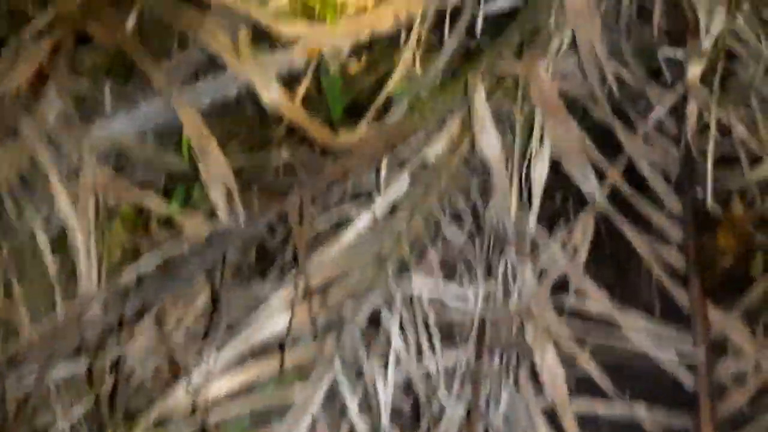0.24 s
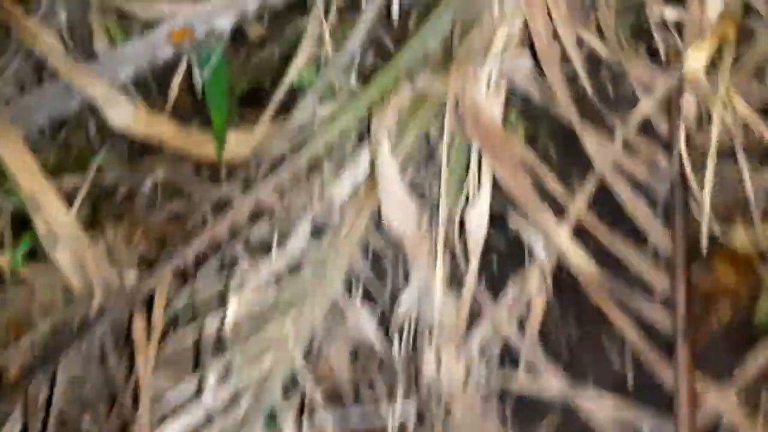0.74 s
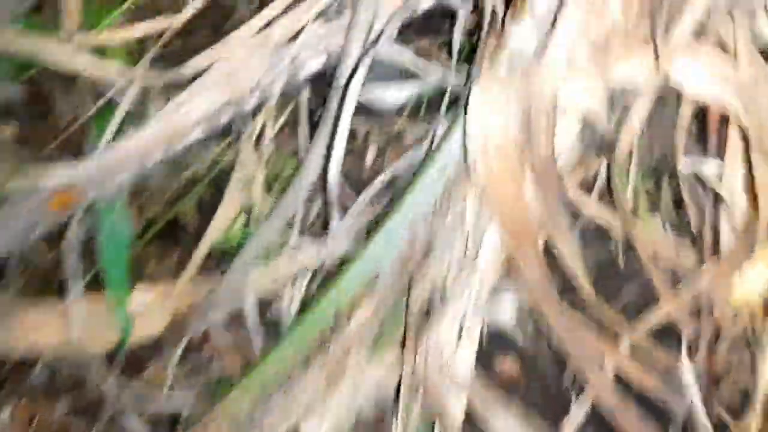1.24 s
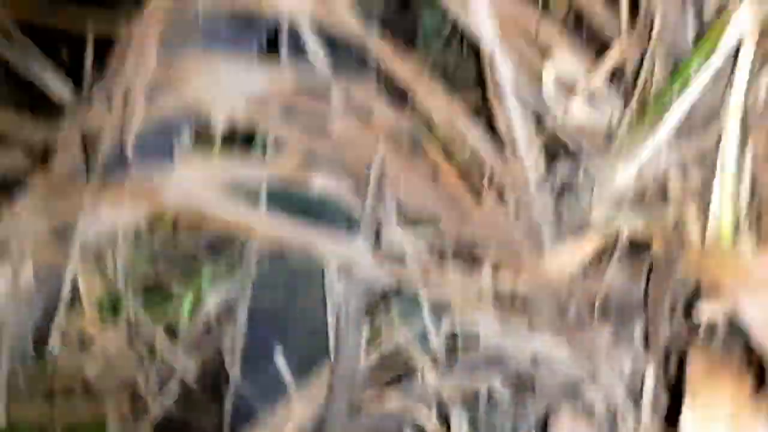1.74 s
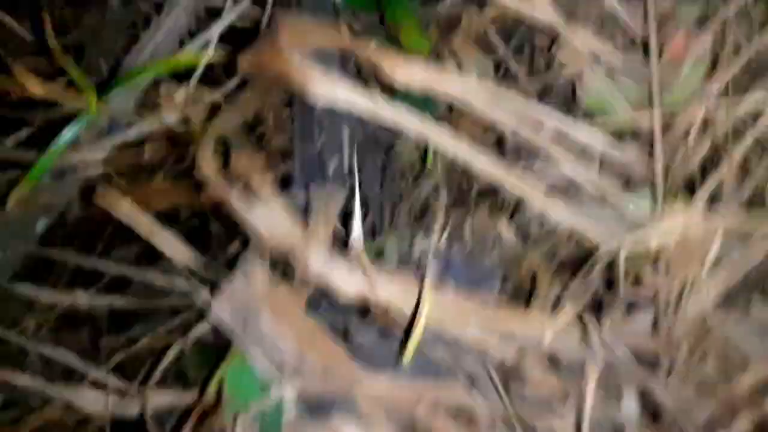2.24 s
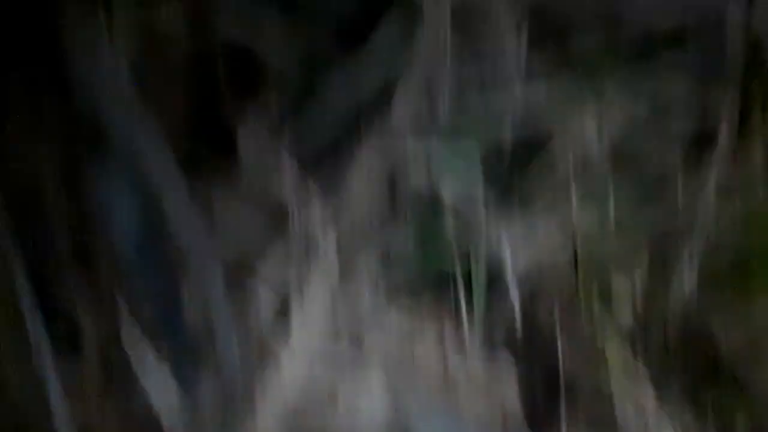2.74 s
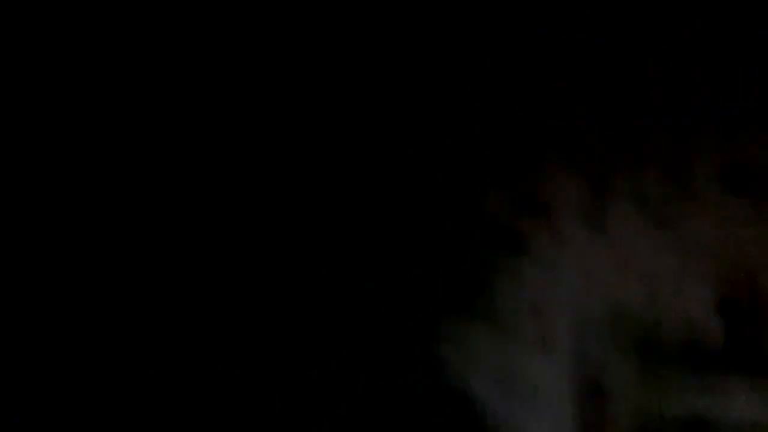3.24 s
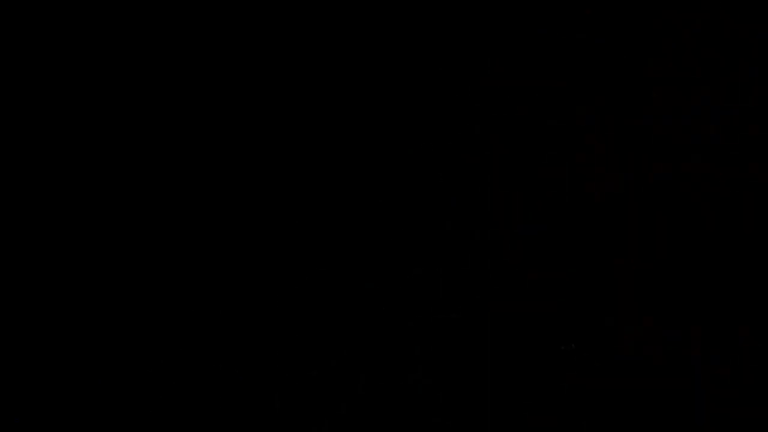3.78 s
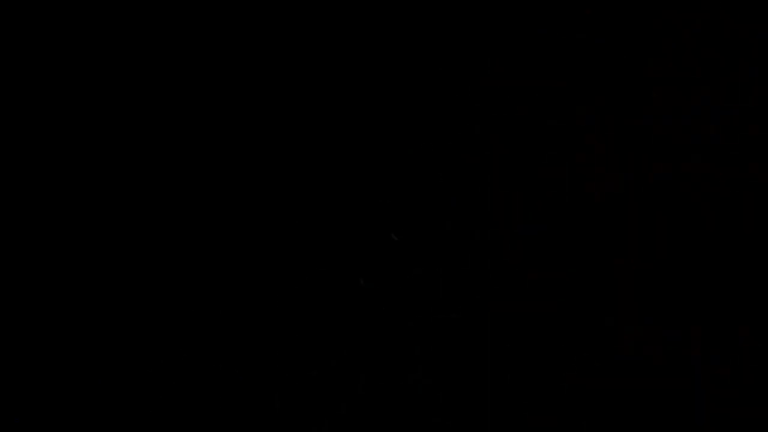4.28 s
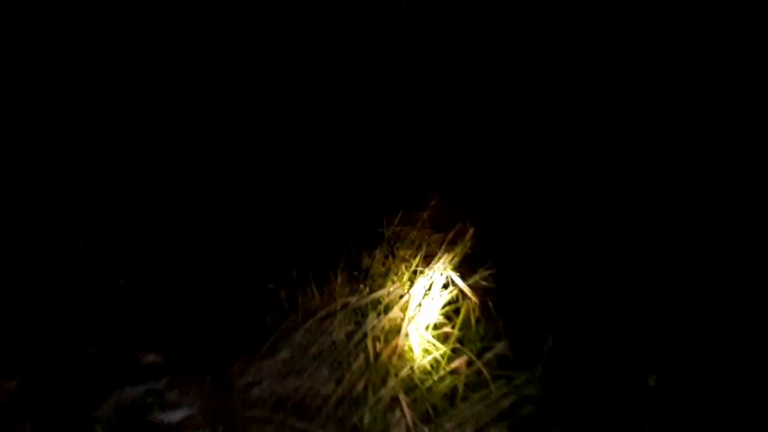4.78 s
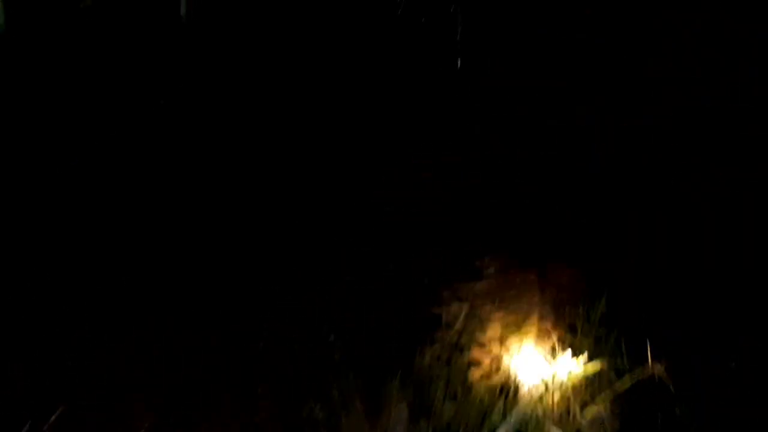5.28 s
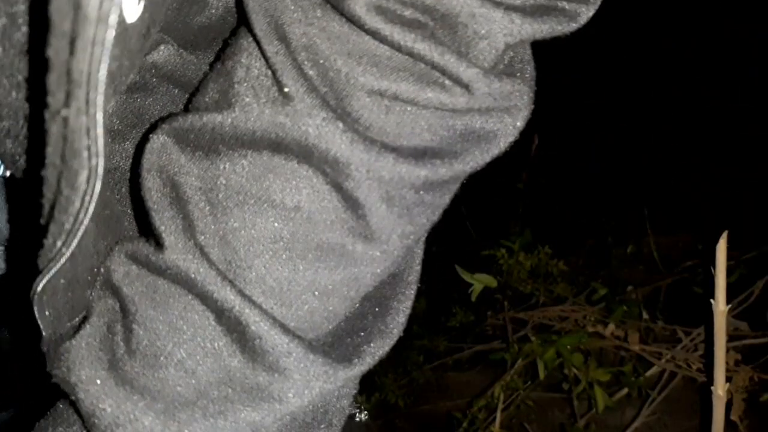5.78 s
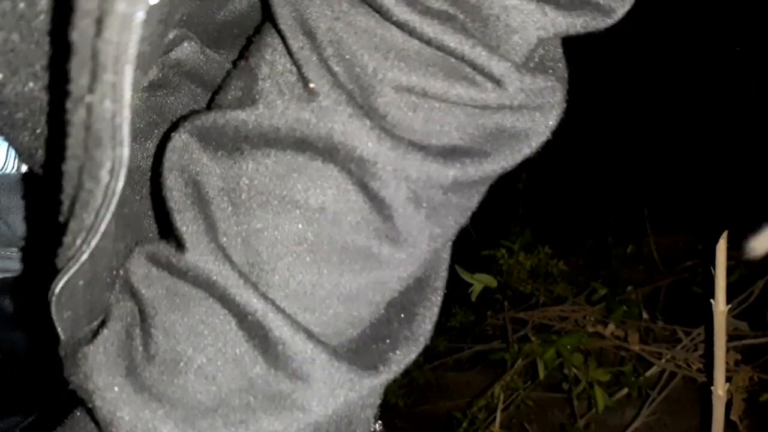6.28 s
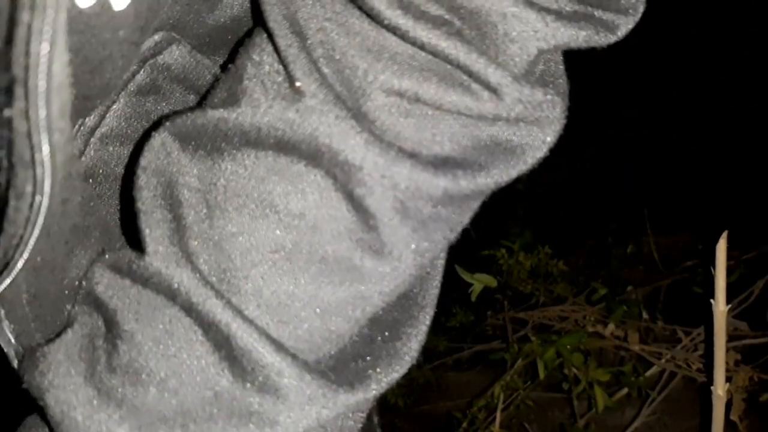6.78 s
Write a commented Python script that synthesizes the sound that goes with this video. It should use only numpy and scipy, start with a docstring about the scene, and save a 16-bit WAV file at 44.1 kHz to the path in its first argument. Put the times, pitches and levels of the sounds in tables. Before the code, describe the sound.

Close, bright crackling of dry fronds and grass swells with each push of a walker's legs, full of sharp little breaks. Dull scrapes and low bumps come from the handheld stereo microphone, loudest along with the biggest snaps. After a few lighter steps the movement ends and the night background comes forward: a thin insect hiss, a steady high trill, quiet chirps and a brief squeak in the right ear.

```python
"""Night walk through dry brush

A walker pushes through dry fronds, a small stereo recorder in hand. Stalks rustle and snap.
Stems and fingers scuff the casing and knock the right microphone port (its opening).
After about 5.5 s the rustle ends and the background steps up;
chirping insects and one short squeak are heard."""
import sys
import numpy as np
from scipy import signal
from scipy.fft import rfft, irfft, next_fast_len
from scipy.io import wavfile

SR = 44100
rng = np.random.default_rng(int(sys.argv[2]) if len(sys.argv) > 2 else 0)


def digitize_waveform(pressure):
    """Quantize a signal to 16-bit integers and store it at the path in sys.argv[1].

    Rows of a 2-D input are taken as channels; values are limited to [-1, 1].
    """
    field = np.atleast_2d(pressure).T
    bounded = np.clip(field, -1, 1)
    quanta = np.round(bounded * 32767).astype(np.int16)
    wavfile.write(sys.argv[1], SR, quanta)


N = 309793

# Tone colour of the rustle: f/Hz, relative level/dB
RUSTLE_SPECTRUM = [(180, -46.5), (300, -14), (1020, -11), (1970, -4.5), (2250, -3), (3510, -1.5),
                   (3870, .5), (5660, -2), (6360, 1), (10300, .5), (15500, 3)]
# Each push of a foot or leg through the stalks:
# t/s at full level, hold/s, rise/s per 20 dB, fall/s per 20 dB, level/dB, brightness/dB per octave
PUSHES = [(0.0, 0.078, 0.11, 0.2, -57.5, 0.5), (0.332, 0.139, 0.057, 0.4, -54.5, -3),
          (0.641, 0.026, 0.27, 0.112, -44.0, -0.5), (0.809, 0.138, 0.172, 0.342, -51, -2.5),
          (1.288, 0.162, 0.081, 0.105, -42.0, -0.5), (1.531, 0.025, 0.061, 0.179, -38, -1.5),
          (1.745, 0.182, 0.347, 0.143, -60.0, 2.0), (2.002, 0.046, 0.048, 0.146, -50.0, -1.0),
          (2.221, 0.201, 0.222, 0.044, -37.5, 0.5), (2.457, 0.077, 0.065, 0.078, -40.5, -0.5),
          (2.575, 0.027, 0.079, 0.031, -42.0, -4.0), (2.651, 0.277, 0.147, 0.385, -59.5, 1.0),
          (3.171, 0.061, 0.223, 0.313, -55.5, 0.5), (3.757, 0.128, 0.096, 0.035, -49.0, -1),
          (3.914, 0.04, 0.01, 0.014, -46.0, 2.5), (3.979, 0.024, 0.003, 0.061, -32, 0.5),
          (4.066, 0.032, 0.024, 0.048, -50.0, 3.5), (4.145, 0.014, 0.015, 0.069, -64.0, 6.0),
          (4.268, 0.022, 0.005, 0.065, -55.5, 2.0), (4.36, 0.17, 0.05, 0.1, -75, 4),
          (4.629, 0.199, 0.126, 0.123, -56.0, 1.0), (4.872, 0.043, 0.045, 0.128, -49.0, 0.5),
          (5.12, 0.17, 0.05, 0.1, -76, 1.5), (5.383, 0.031, 0.052, 0.112, -57, 1.5),
          (5.521, 0.021, 0.015, 0.09, -53.5, 2.5)]


def rustle():
    """Sliding, folding stalks make thousands of tiny cracks a second, each spanning low to high."""
    level_db, tilt_db = push_curves()
    cracks = grains(per_s=2000, spread_db=3.5, clump_db=3, hiss=.7)
    crackle = rms_one(with_notes(cracks))
    stalks = coloured([crackle, -crackle], RUSTLE_SPECTRUM, tilt_db, flicker_db=2.04, pivot_hz=2900)
    return stalks * from_db(level_db) * sides(-3.2)


def push_curves():
    """The rustle's level and brightness follow the pushes of the legs."""
    *shape, brightness = np.transpose(PUSHES)
    return level_and_tilt(swells(*shape), brightness)


# Faint narrow notes within the crackle, which also colour the snaps: f/Hz, width/Hz, level/dB
RUSTLE_NOTES = [(1500, 110, -24), (2080, 60, -28), (2310, 110, -21), (2750, 100, -27), (3700, 130, -25),
                (4200, 200, -22), (4620, 120, -26), (5300, 110, -25), (6500, 150, -24), (7500, 130, -24),
                (9200, 150, -25), (10100, 150, -24)]


def with_notes(cracks):
    """Adds faint narrow notes that swell and fade at random within the crackle."""
    return cracks + sum(from_db(db + 5.5 * drift(9)) * rms_one(resonance(cracks, hz, width_hz))
                        for hz, width_hz, db in RUSTLE_NOTES)


# The loudest stalks breaking: t/s, peak level/dB, f/Hz
BIG_SNAPS = [(1.4032, -27, 11200), (1.4212, -28, 8000), (1.5075, -29, 5430), (1.515, -22, 1700),
             (1.5285, -24, 1500), (1.5329, -22.0, 4190), (1.5604, -25.0, 11000), (1.595, -30, 1100),
             (1.6195, -27, 1200), (2.079, -31, 9000), (2.096, -33, 7000), (2.1186, -23, 4500),
             (2.2697, -19, 8900), (2.3431, -15.0, 9000), (2.4194, -22.0, 7460), (2.4568, -15, 4200),
             (2.5067, -15, 6000), (2.5204, -24.0, 10600), (2.5706, -20, 2200), (2.6504, -33.0, 6000),
             (2.7177, -28.0, 9000), (2.7861, -36, 3000), (3.8202, -35.0, 3490), (3.8344, -38.0, 7000),
             (3.8918, -23, 4500), (3.9085, -37, 8000), (3.9135, -18, 4500), (3.9305, -31, 5000),
             (3.9715, -33, 8000), (3.9759, -12, 3500), (3.9772, -14, 7000), (4.0682, -25.0, 5000),
             (4.135, -45, 6000), (4.152, -43.0, 6800), (4.357, -52, 8500), (4.376, -51, 8500),
             (4.2647, -25, 6000), (4.7177, -31.0, 8000), (4.7234, -31.0, 8500), (4.8648, -25.0, 4800),
             (4.8883, -25.0, 4650), (5.3926, -30, 9000), (5.5164, -27, 3990), (5.5338, -37.0, 6000)]
# A bent stalk slipping in a quick run: t/s, number of slips, gap/s, peak level/dB, f/Hz, pan/dB
CREAKS = [(2.472, 5, .006, -37, 6500, -10), (2.7244, 2, 0.0038, -38, 9000, -7),
          (4.086, 6, 0.0048, -36.5, 7000, 2), (4.274, 4, 0.0097, -36.5, 9000, 3)]
SNAP_PAN_DB = -6   # pan is always left minus right, so below zero is to the right


def snaps():
    """Each break or slip is a sharp crack with its own colour and a short splintering tail."""
    slips = [(s + k * gap, *rest) for s, count, gap, *rest in CREAKS for k in range(round(count))]
    breaks = [(*row, SNAP_PAN_DB) for row in list(BIG_SNAPS) + small_snaps(count=140)] + slips
    out, t = np.zeros((2, N)), np.arange(1300) / SR
    age = np.maximum(t - .0008, 0)
    fade = (age > 0) * (np.exp(-age / .0004) + .12 * np.exp(-age / .004))   # crack + tail
    bursts = rng.standard_normal((len(breaks), 2, len(t))) * fade
    note_hz, note_width, _ = np.transpose(RUSTLE_NOTES)
    note_gains = from_db(rng.normal(-13, 6, (len(breaks), len(note_hz))))
    for (s, peak_db, hz, pan_db), burst, gains in zip(breaks, bursts, note_gains):
        crack = rms_one(resonance(burst, hz, .6 * hz))
        crack += .9 * rms_one(filtered(burst, 2, .3 * hz, "high"))
        for k in np.argsort(np.abs(np.log(note_hz / hz)))[:4]:   # the four nearest notes colour it
            crack += gains[k] * rms_one(resonance(burst, note_hz[k], 2 * note_width[k]))
        crack *= sides(pan_db)
        i = round(s * SR)
        out[:, i:i + len(t)] += from_db(peak_db) * crack / np.abs(crack.mean(axis=0)).max()
    return out


def small_snaps(count):
    """Thin stalks break at random moments, peaking 7 to 13 dB above the rustle around them."""
    when, weakness, colour = rng.random((count, 3)).T
    s = when * (N / SR - .1)
    rustle_db, _ = push_curves()
    peak_db = rustle_db[(s * SR).astype(int)] + 13 - 6 * weakness
    return list(zip(s, peak_db, 1500 * 8 ** colour))


def hand_shade(stalks):
    """The hand shields the right port from part of the stalks' highest treble."""
    left, right = stalks
    return np.array([left, right - .45 * filtered(right, 2, 9000, "high")])


# Knocks on the right port: t/s, level/dB, swing f/Hz
KNOCKS = [(2.3886, -7.5, 88), (2.4035, -18, 400), (2.405, -15, 400), (2.4066, -20, 400), (2.4098, -15, 110),
          (2.4146, -13, 300), (2.4193, -21, 300), (2.4246, -17, 300), (2.4261, -18, 200), (3.9765, -23, 90)]


def knocks():
    """A knock is a spike, then a step in pressure that swings out through the port's bass cut."""
    jolt = -np.ones(3000)
    jolt[:9] = 1.3 * np.sin(np.linspace(0, np.pi, 9))
    jolt = filtered(jolt, 2, 7000, "low")
    out = np.zeros(N)
    for s, level_db, swing_hz in KNOCKS:
        i = round(s * SR)
        out[i:i + len(jolt)] += from_db(level_db) * filtered(jolt, 4, swing_hz, "high")
    return out * from_db([[-40], [0]])


# Tone colour of a scuff: f/Hz, relative level/dB
SCUFF_SPECTRUM = [(71, -38.5), (120, -2.5), (304, -3.5), (567, -4), (1330, -9.5), (1570, -4.5),
                  (1800, -15.5)]
# Hand and stems scuffing the casing:
# t/s, hold/s, fall/s per 20 dB, scuff level/dB, brightness/dB per octave, rumble level/dB
SCUFFS = [(0.046, 0.038, 0.17, -68, -4, -82), (0.645, 0.021, 0.075, -44.5, 1.0, -51),
          (0.827, 0.17, 0.14, -69.5, -3.0, -73.5), (1.366, 0.014, 0.106, -56, 0.0, -63.5),
          (1.511, 0.101, 0.196, -56.0, 3.0, -81.5), (1.931, 0.037, 0.144, -77.5, -2.5, -67.0),
          (2.119, 0.023, 0.113, -54.5, -1.0, -65.5), (2.224, 0.081, 0.055, -51.0, 0.0, -58.5),
          (2.39, 0.027, 0.034, -43, -2.0, -39), (2.472, 0.099, 0.133, -61.0, -3.5, -62.0),
          (2.577, 0.018, 0.041, -45, 3, -61.0), (2.926, 0.055, 0.074, -68, -3, -74.5),
          (3.065, 0.11, 0.195, -65.5, 1.0, -75.5), (3.278, 0.04, 0.088, -84.5, 4.0, -70.5),
          (3.721, 0.119, 0.13, -67.0, -1.5, -82.0), (3.982, 0.008, 0.045, -52.0, -4.5, -41),
          (4.288, 0.027, 0.053, -72.0, 4.0, -90.0), (4.569, 0.071, 0.213, -78.5, 8.0, -105.0),
          (4.817, 0.092, 0.036, -61, 1, -72), (4.959, 0.021, 0.084, -64, 1.5, -78),
          (5.154, 0.054, 0.066, -77.0, 0.5, -87.0), (5.453, 0.026, 0.164, -70, 0.5, -82.0)]
SCUFF_RISE_S = .025   # per 20 dB


def scuffs():
    """Hand and stems slip on the casing: dull scrapes and low lumps of air, different in each port."""
    s, hold, fall, scuff_db, brightness, rumble_db = np.transpose(SCUFFS)
    # Every push also brushes stems over the casing, more quietly than it rustles.
    stems = swells(*np.transpose(PUSHES)[:-1]).sum(axis=1, keepdims=True)
    scuff_power = np.hstack([swells(s, hold, SCUFF_RISE_S, fall, scuff_db), stems * from_db(-21) ** 2])
    low_power = np.hstack([swells(s, hold, SCUFF_RISE_S, fall, rumble_db), stems * from_db(-36.5) ** 2])
    brightness = np.append(brightness, 3.5)   # the stems' own brightness
    scrape_db, tilt_db = level_and_tilt(scuff_power, brightness)
    lumps_db, _ = level_and_tilt(low_power, brightness)
    slips = [grains(per_s=300, spread_db=3, clump_db=2.5, hiss=.47) for _ in range(2)]
    scrape = coloured(slips, SCUFF_SPECTRUM, tilt_db, flicker_db=2.5, pivot_hz=450)
    scrape = filtered(scrape, 4, 1300, "low")
    lumps = rms_one(filtered(rng.standard_normal((2, N)), 2, [60, 140], "band"))
    return (from_db(scrape_db) * scrape + from_db(lumps_db) * lumps) * sides(-2.5)


# Fingers rubbing and thudding on the casing: t/s, length/s, f/Hz, width/Hz, level/dB
FINGER_RUBS = [(.045, .015, 1400, 900, -63), (.08, .07, 161, 28, -63), (.645, .05, 300, 120, -50),
               (.65, .04, 1530, 250, -54), (1.361, .012, 360, 130, -44), (1.375, .014, 360, 130, -45),
               (1.925, .07, 830, 50, -72), (2.925, .06, 165, 40, -61), (2.93, .05, 400, 80, -68),
               (4.266, .04, 716, 300, -67), (4.938, .015, 620, 150, -57), (4.955, .045, 450, 130, -57),
               (4.96, .04, 700, 200, -61), (5.145, .02, 600, 180, -68), (5.17, .05, 560, 250, -71),
               (5.18, .07, 810, 50, -73), (5.39, .045, 750, 300, -66), (5.445, .06, 740, 250, -64),
               (5.447, .03, 280, 120, -66), (5.49, .015, 270, 120, -65)]


def finger_rubs():
    """Rough noise rings in a hollow between hand and casing, quick to start and slower to end."""
    out, t = np.zeros((2, N)), np.arange(8000) / SR
    for s, length, hz, width_hz, level_db in FINGER_RUBS:
        fade = np.clip(t / .004, 0, 1) * np.exp(-(t / length) ** 4)
        rub = rng.standard_normal((2, len(t))) * fade
        hollow = resonance(resonance(rub, hz, width_hz), hz, 2 * width_hz)
        i = round(s * SR)
        out[:, i:i + len(t)] += from_db(level_db) * rms_one(hollow) * np.sqrt(length * SR / len(t))
    return out * sides(-2.5)


# Dull taps on the casing: t/s, strength/dB
TAPS = [(0.655, -35), (0.676, -38), (2.115, -55), (2.567, -39), (2.588, -34.5), (4.812, -49), (4.836, -48),
        (4.862, -41), (4.886, -42)]
# Notes that the casing rings at: f/Hz, width/Hz, gain/dB
CASING_RINGS = [(210, 170, 4), (354, 93, -15), (600, 200, -16), (900, 180, -7)]


def taps():
    """Soft touches set the casing ringing, with new strengths each time and in each port."""
    s, strength_db = np.transpose(TAPS)
    chance_db = rng.normal(0, 2.5, (len(s), len(CASING_RINGS), 2))
    out = 0
    for k, (hz, width_hz, db) in enumerate(CASING_RINGS):
        hits = from_db(strength_db[:, None] + db + chance_db[:, k])
        hits[:, 0] *= (-1) ** k   # every other note is upside down on the left
        clicks = np.zeros((2, N))
        clicks[:, np.round(s * SR).astype(int)] = hits.T
        out += resonance(clicks, hz, width_hz)
    return filtered(out, 3, [120, 1250], "band") * from_db([[-9], [0]])


# Path of the squeak at the right port: t/s, f/Hz, level/dB
SQUEAK_PATH = [(6.42, 1144, -84), (6.45, 1150, -75), (6.53, 1233, -71), (6.585, 1215, -67),
               (6.6, 1195, -48), (6.615, 1195, -43.5), (6.635, 1212, -39.5), (6.655, 1210, -44),
               (6.678, 1190, -48), (6.695, 1190, -80.5)]
# Its overtones: multiple of the pitch, relative level/dB
SQUEAK_OVERTONES = [(2, -15), (3, -22), (4, -23), (5, -34.5)]


def squeak():
    """Quick sticking and slipping makes a tone with an uneven pitch and fluttering overtones."""
    hz, _ = in_time(SQUEAK_PATH)
    _, level_db = in_time(SQUEAK_PATH, outside=-120)
    weak = np.clip((-55.5 - level_db) / 10, 0, 1)   # faint rubbing slips less steadily
    wobble = (.011 + .028 * weak) * drift(150)
    phase = 2 * np.pi * np.cumsum(hz * (1 + wobble)) / SR
    tone = np.sin(phase) * from_db((2 + 2.3 * weak) * drift(40))
    for multiple, db in SQUEAK_OVERTONES:
        tone += from_db(db + 4.5 * drift(120)) * np.sin(round(multiple) * phase)
    return tone * from_db(level_db) * from_db([[-45], [0]])


# Raspy chirps: t/s, rise/s, fade/s, level/dB, low voice gain/dB, opening ping gain/dB
RASPS = [(5.755, .03, 0.085, -69, -3, -30), (5.911, .008, 0.092, -66.5, 2, -1),
         (6.088, .004, 0.071, -66, -3, 5), (6.24, .003, .008, -65, -10, 3), (6.257, .004, 0.11, -66, -2, 5)]
# Notes of the rasps' low voice: f/Hz, width/Hz, relative level/dB
RASP_LOW_NOTES = [(2326, 160, -12), (3020, 240, -14.5), (4300, 320, -12.5)]
# Soft, swelling chirps: t/s, length/s, level/dB
SOFT_CHIRPS = [(6.07, .08, -62.5), (6.275, .12, -60.5), (6.55, .11, -61.5), (6.79, .15, -60.5)]


def near_insects():
    """Nearer insects make rasps that trail off, some opening on a ping, and soft swelling chirps."""
    start = round(5.7 * SR)
    t = np.arange(start, N) / SR
    noise = rng.standard_normal((2, N - start))
    low = sum(from_db(db) * noise_note(noise, hz, width_hz) * from_db(3 * drift(30)[start:])
              for hz, width_hz, db in RASP_LOW_NOTES)
    high = from_db(1) * noise_note(noise, hz=5760, width_hz=1160)
    ping = from_db(1) * noise_note(noise, hz=5650, width_hz=140)
    soft = noise_note(noise, hz=8300, width_hz=1700)
    rasps, chirps = 0, 0
    for s, rise, fade, level_db, low_db, ping_db in RASPS:
        age = np.maximum(t - s, 0)
        stroke = from_db(level_db) * np.minimum(age / rise, 1) * np.exp(-(age / fade) ** 2)
        rasps += stroke * (high + from_db(low_db) * low + from_db(ping_db) * np.exp(-age / .035) * ping)
    for s, length, level_db in SOFT_CHIRPS:
        chirps += from_db(level_db) * arch((t - s) / length) * soft
    rasps *= from_db(1.5 * drift(70)[start:])
    return np.pad(chirps * sides(-11) + rasps * sides(-7), [(0, 0), (start, 0)])


# Tone colour of the far chorus: f/Hz, relative level/dB
CHORUS_SPECTRUM = [(25, -26.5), (60, -26), (180, -22.5), (1200, -34.5), (3100, -31.5), (5000, -39.5),
                   (6700, -34), (7200, -19.5), (9700, -10), (10400, -8.5), (11500, -7), (12300, -13),
                   (14400, -18), (15600, -26)]
# How loud the far insects are: t/s, chorus level/dB, extra trill gain/dB
CHORUS_LEVELS = [(0, -59, -10), (3.6, -66, -8), (5.5, -64, -4.5), (5.65, -60, 0), (7.02, -61.5, 1)]
CHIRPER_START_S, CHIRPER_PERIOD_S, CHIRPER_LENGTH_S = 5.745, .1713, .1   # repeats before and after


def far_insects():
    """A hissing chorus, a steady trill and a regular high chirper rise and fall together."""
    chorus_db, trill_db = in_time(CHORUS_LEVELS)
    size = next_fast_len(N)
    colour = from_db(at_hz(CHORUS_SPECTRUM, np.arange(1, size // 2 + 2) * SR / size))
    hiss = irfft(rfft(rng.standard_normal((2, size))) * colour, size)[:, :N]
    chorus = rms_one(hiss) * from_db(chorus_db + .8 * drift(5)) * sides(-3)
    trill = wing_rub(hz=10904, width_hz=148, per_s=52, depth=.31) * from_db(trill_db - 64.5) * sides(-7)
    chirper = wing_rub(hz=13400, width_hz=1800, per_s=60, depth=.26) * from_db(-65) * sides(8)
    chirp_age = (np.arange(N) / SR - CHIRPER_START_S) % CHIRPER_PERIOD_S
    chirper *= arch(chirp_age / CHIRPER_LENGTH_S)
    return chorus + (trill + chirper) * from_db(chorus_db - chorus_db[-1])


def wing_rub(hz, width_hz, per_s, depth):
    """An insect's wing noise rings at one note and throbs with the strokes."""
    stroke_rate = per_s * (1 + .05 * drift(7.5))
    throb = 1 + depth * np.sin(2 * np.pi * np.cumsum(stroke_rate) / SR)
    return noise_note(rng.standard_normal((2, N)), hz, width_hz) * throb


def grains(per_s, spread_db, clump_db, hiss):
    """Random clicks of uneven size swell in clumps over a smooth hiss, different in each channel."""
    clicks = rng.random((2, N)) < per_s / SR
    sizes = from_db(spread_db * np.minimum(rng.exponential(1, (2, N)), 4)) * rng.choice([-1, 1], (2, N))
    clumps = from_db(clump_db * drift(27))
    return rms_one(rms_one(clicks * sizes * clumps) + hiss * rng.standard_normal((2, N)))


def coloured(sources, spectrum, tilt_db, flicker_db, pivot_hz):
    """Builds a tone colour from flickering half-octave bands, taken from two sources in turn."""
    lowest, highest = spectrum[0][0], spectrum[-1][0]
    edges = lowest * 2 ** np.arange(0, np.log2(highest / lowest) + .5, .5)
    out, power = 0, 0
    for k, (low, high) in enumerate(zip(edges, np.minimum(edges[1:], .45 * SR))):
        hz = np.sqrt(low * high)
        band, db = filtered(sources[k % 2], 2, [low, high], "band"), at_hz(spectrum, hz)
        out += band * from_db(db + tilt_db * np.log2(hz / pivot_hz) + flicker_db * drift(5.8))
        power += from_db(db) ** 2 * (high - low) / (SR / 2)
    return out / np.sqrt(power)


def swells(s, hold, rise, fall, level_db):
    """The power of each event at every 40th sample: it rises, holds, then falls."""
    t = np.arange(0, N + 40, 40)[:, None] / SR
    early, late = np.maximum(s - t, 0), np.maximum(t - s - hold, 0)
    return from_db(np.maximum(level_db - 20 * (early / rise + late / fall), -130)) ** 2


def level_and_tilt(power, brightness):
    """Adds events up to one level in dB and one brightness, in which louder events count for more."""
    total = power.sum(axis=1)
    curves = 10 * np.log10(total), (power * brightness).sum(axis=1) / total
    return [np.interp(np.arange(N), np.arange(len(total)) * 40, curve) for curve in curves]


def drift(rate_hz):
    """A smooth random wander, about 1 in size."""
    r = np.exp(-80 * np.pi * rate_hz / SR)
    slow = signal.lfilter([1], [1, -2 * r, r * r], rng.standard_normal(N // 40 + 2002))[2000:]
    return np.interp(np.arange(N) / 40, np.arange(len(slow)), rms_one(slow))


def resonance(x, hz, width_hz):
    """Rings at one note; a smaller width rings longer."""
    r = np.exp(-np.pi * width_hz / SR)
    return signal.lfilter([1, 0, -1], [1, -2 * r * np.cos(2 * np.pi * hz / SR), r * r], x + 1e-18)


def noise_note(noise, hz, width_hz):
    """Noise narrowed to one note by ringing twice."""
    return rms_one(resonance(resonance(noise, hz, width_hz), hz, width_hz))


def filtered(x, order, hz, keep):
    """Keeps the lows, the highs or a band."""
    return signal.sosfilt(signal.butter(order, hz, keep, fs=SR, output="sos"), x)


def sides(pan_db):
    """Left and right gains, the left pan_db above the right."""
    left = from_db(pan_db)
    return 2 * np.array([[left], [1]]) / np.sqrt(1 + left ** 2)


def in_time(rows, outside=None):
    """Joins a table's rows with straight lines in time."""
    s, *columns = np.transpose(rows)
    return [np.interp(np.arange(N) / SR, s, c, left=outside, right=outside) for c in columns]


def at_hz(spectrum, hz):
    """A tone colour's level in dB at any frequency."""
    points_hz, db = np.transpose(spectrum)
    return np.interp(np.log(hz), np.log(points_hz), db)


def arch(progress):
    """Swells and fades once as progress goes from 0 to 1."""
    return np.sin(np.pi * np.clip(progress, 0, 1))


def from_db(db):
    """Turns decibels into a gain."""
    return 10 ** (np.asarray(db) / 20)


def rms_one(x):
    """Scales each channel to an average power of 1."""
    return x / np.sqrt(np.mean(x ** 2, axis=-1, keepdims=True) + 1e-20)


def scene():
    """Stalks, touches on the recorder, insects and the squeak sound together."""
    stalks = hand_shade(rustle() + snaps())
    handling = scuffs() + finger_rubs() + taps() + knocks()
    return stalks + handling + far_insects() + near_insects() + squeak()


def record(dry):
    """The very highest treble is cut off steeply."""
    return signal.sosfilt(signal.cheby2(14, 70, 16328, fs=SR, output="sos"), dry)


dry = scene()
out = record(dry)
digitize_waveform(out)
```